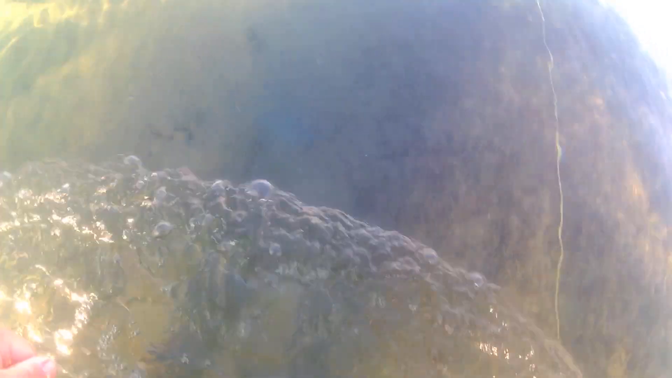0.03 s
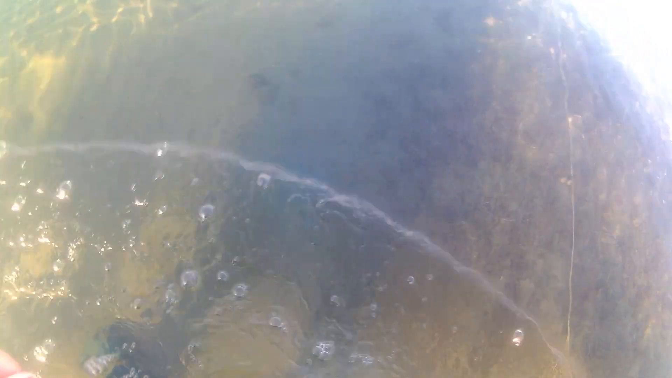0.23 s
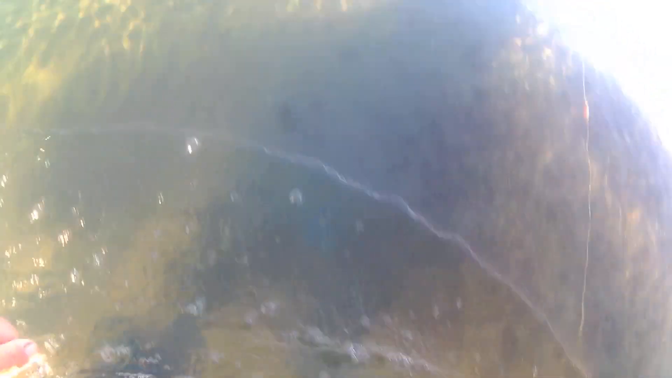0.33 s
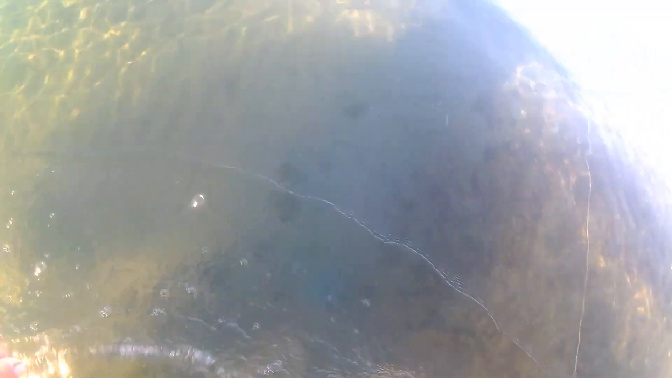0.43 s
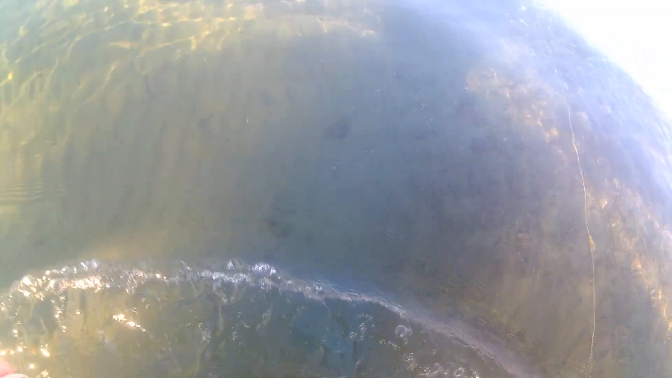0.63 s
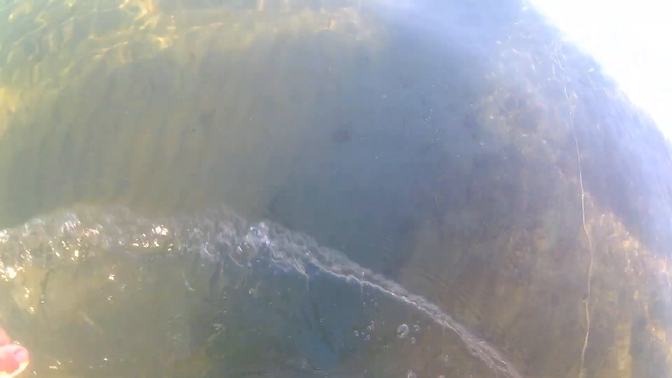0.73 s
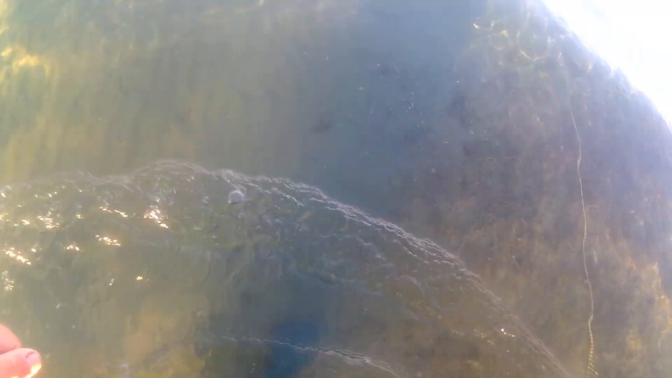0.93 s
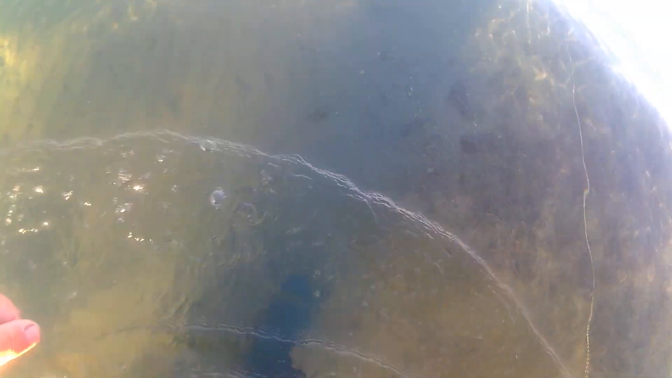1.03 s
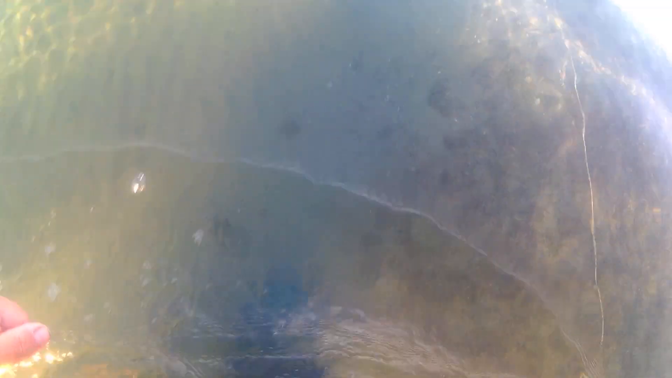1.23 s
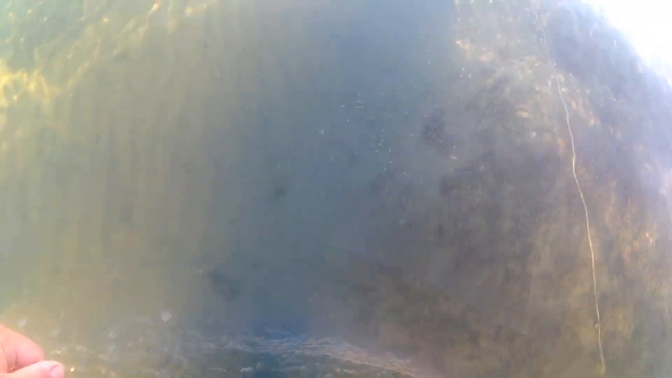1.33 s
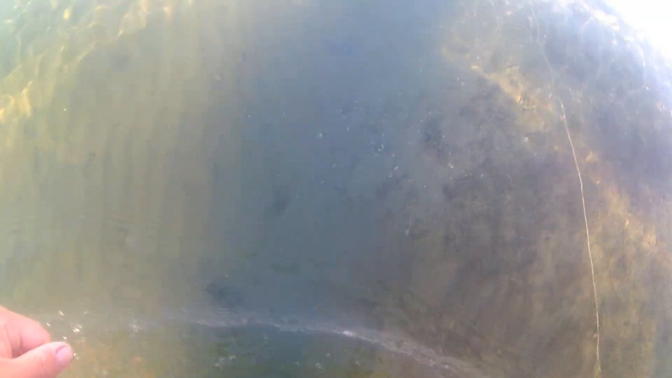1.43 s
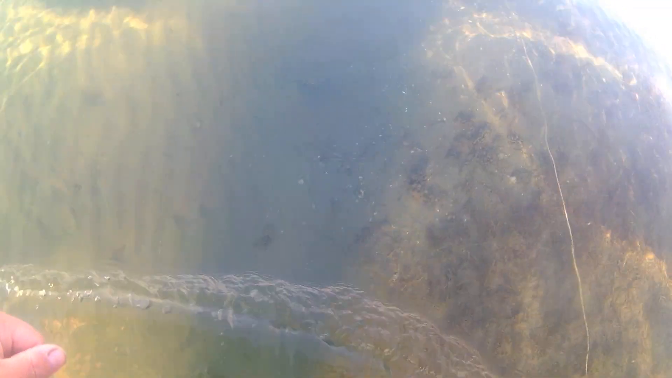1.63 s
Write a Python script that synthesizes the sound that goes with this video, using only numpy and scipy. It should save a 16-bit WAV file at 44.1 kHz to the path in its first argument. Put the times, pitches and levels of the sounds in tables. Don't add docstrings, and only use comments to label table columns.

```python
import sys
import numpy as np
from scipy import signal
from scipy.fft import rfft, irfft, next_fast_len
from scipy.io import wavfile
from scipy.ndimage import map_coordinates

SR = 44100
rng = np.random.default_rng(int(sys.argv[2]) if len(sys.argv) > 2 else 0)


def waveform_to_disk(signal):
    frames = np.transpose(np.atleast_2d(signal))
    scaled = np.clip(frames, -1, 1) * 32767
    samples = np.round(scaled).astype(np.int16)
    wavfile.write(sys.argv[1], SR, samples)


def voltage_ratio(level):
    return 10 ** (np.asarray(level, float) / 20)


N = 74970
DAMPING_GROWS = 1.175


def unit(x):
    return x / np.sqrt(np.mean(x ** 2) + 1e-20)


def curve(rows):
    return np.interp(np.arange(N) / SR, *np.transpose(rows))


def wobble(rate):
    knots = rng.standard_normal(int(N * rate / SR) + 4)
    return map_coordinates(knots, [np.arange(N) * rate / SR])


def filtered(x, response):
    size = next_fast_len(N + SR // 2)
    spectrum = rfft(x, size) * response(np.fft.rfftfreq(size, 1 / SR))
    return irfft(spectrum, size)[..., :N]


def resonances(peaks):
    def response(f):
        total = 0
        for k, (hz, width, db) in enumerate(peaks):
            damping = 1j * f * width
            total = total + (-1) ** k * voltage_ratio(db) * damping / (hz * hz - f * f + damping)
        return total
    return response


def ring(start_s, hz, db, t60, rise_s, grows=1):
    first = round(start_s * SR)
    t = np.maximum(np.arange(N) / SR - start_s, 0)[first:][:SR // 4]
    level = voltage_ratio(db - 60 * (t / t60) ** grows) * (1 - np.exp(-t / rise_s))
    out = np.zeros(N)
    out[first:][:len(t)] = level * np.sin(2 * np.pi * hz * t)
    return out


# frequency in Hz, level in dB per Hz.
HISS = [(12, -32), (20, -3), (70, -0.5), (897, -16), (976, -17), (1610, -18), (4540, -23.5), (9670, -25.5),
        (16000, -24.5)]
# frequency in Hz, level in dB rms.
WHINE = [(9135, -97.5), (9297, -86), (9378, -81), (9453, -81), (9534, -89)]
HISS_DB = -61.5
HUM_HZ, HUM_DB = 60, -71


def electronics():
    t = np.arange(N) / SR
    hiss_hz, hiss_db = np.transpose(HISS)

    def colour(hz):
        return voltage_ratio(np.interp(np.log(hz + 1), np.log(hiss_hz + 1), hiss_db))

    hiss = voltage_ratio(HISS_DB + 0.4 * wobble(9.2)) * unit(filtered(rng.standard_normal(N), colour))
    hum = voltage_ratio(HUM_DB + 2.8 * wobble(8)) * np.sin(2 * np.pi * HUM_HZ * t + 0.4 * wobble(7.6))
    whine = np.zeros(N)
    for hz, db in WHINE:
        phase = 2 * np.pi * (hz * t + rng.random()) + 0.8 * wobble(17)
        whine += voltage_ratio(db + 1) * np.sin(phase)
    return hiss + hum + whine


# time in seconds, level in dB.
SLOSH = [
    (0.0, -87),
    (0.236, -56.5),
    (0.444, -58.5),
    (0.548, -75),
    (0.808, -66.5),
    (1.164, -64),
    (1.61, -83),
    (1.7, -77),
]
# frequency in Hz, width in Hz, level in dB.
SLOSH_BAND = [(176, 70, -3), (264, 17, 1.5)]


def slosh():
    murmur = filtered(rng.standard_normal(N), resonances(SLOSH_BAND))
    return voltage_ratio(curve(SLOSH) - 6) * unit(voltage_ratio(2.5 * wobble(45)) * murmur)


# time in seconds, level in dB.
TRICKLE = [(0, -70.5), (.1, -68.5), (.15, -60.5), (.2, -66.5), (.3, -56.5), (.36, -55), (.44, -59.5),
           (.51, -59), (.58, -66.5), (.74, -65.5), (.82, -59), (.88, -65), (.96, -59.5), (1.1, -61),
           (1.16, -71.5), (1.27, -56.5), (1.36, -71), (1.7, -72.5)]
# frequency in Hz, width in Hz, level in dB.
SHELL = [(902, 86, -3.5), (1424, 200, -18), (1668, 105, -6), (4170, 200, -15)]
TICKS_PER_S, TICK_SPREAD_DB = 520, 3
WASH_SHARE = 0.5


def trickle():
    hits = rng.random(N) < TICKS_PER_S / SR
    ticks = hits * voltage_ratio(TICK_SPREAD_DB * rng.standard_normal(N)) * rng.choice([-1, 1], N)
    wash = rng.standard_normal(N)
    drive = np.sqrt(1 - WASH_SHARE) * unit(ticks) + np.sqrt(WASH_SHARE) * wash
    clumped = drive * voltage_ratio(3.3 * wobble(30))

    def shell(f):
        return resonances(SHELL)(f) * resonances([(1680, 600, 0)])(f)

    return voltage_ratio(curve(TRICKLE)) * unit(filtered(clumped, shell))


# start in seconds, level in dB, t60 in seconds.
RUNOFF = [
    (.335, -54, 0.48),
    (1.283, -60, 0.18),
]
# frequency in Hz, width in Hz, level in dB.
RUNOFF_BANDS = [(780, 90, -5), (1346, 200, -0.5)]


def runoff():
    t = np.arange(N) / SR
    level = np.zeros(N)
    for start_s, db, t60 in RUNOFF:
        level += (t > start_s) * voltage_ratio(db - 60 * np.abs(t - start_s) / t60)

    def lid(f):
        return resonances(RUNOFF_BANDS)(f) * resonances([(1100, 900, 0)])(f)

    gurgle = rng.standard_normal(N) * voltage_ratio(3.5 * wobble(60))
    return level * unit(filtered(gurgle, lid))


# start in seconds, level in dB, pitch in Hz.
DRIPS = [(.8200, -51, 1660), (.8470, -55, 1690), (0.922, -49, 1650), (0.953, -54, 1560), (0.972, -55, 1510),
         (1.016, -55, 1790), (1.097, -54, 1488), (1.228, -58, 1730), (1.239, -67, 1670), (1.264, -50, 1547),
         (0.149, -49, 1670)]


def drips():
    return sum(ring(s, hz, db, 0.0298, 0.00071, DAMPING_GROWS) for s, db, hz in DRIPS)


# frequency in Hz, t60 in seconds.
BODY = [(200, 0.14), (236, .18), (262, .4), (630, 0.21)]
# start in seconds, then the level of each body mode in dB.
THUDS = [
    (0.2289, -60, -79, -50, -67),
    (.2490, -52, -54.5, -49.5, -71),
    (0.3279, -39, -43.5, -53.5, -48),
    (0.5252, -53, -57, -56, -65),
    (0.6306, -51, -55, -61.5, -73),
    (1.1635, -53, -84.5, -61, -59),
    (1.2780, -34, -38.5, -67, -47.5),
]
# start in seconds, level in dB, pitch in Hz.
SHOVES = [
    (0.2472, -48, 109),
    (0.327, -38, 111.5),
    (1.2764, -52, 111),
]


def thuds():
    out = np.zeros(N)
    for start_s, *levels in THUDS:
        for (hz, t60), db in zip(BODY, levels):
            out += ring(start_s, hz, db, t60, 0.00139)
    for start_s, db, hz in SHOVES:
        out += ring(start_s, hz, db, 0.05, 0.001927)
    return out


# start in seconds, level in dB, shell pitch in Hz, lens port level in dB,
# level of crack and high modes in dB; the last two are relative to the blow.
BLOWS = [(.2280, -20, 1662, -27.5, -29), (0.2326, -25.5, 1647, -36, -35.5),
         (0.2492, -21.5, 1850, -14, -16.5), (.2518, -20.5, 1710, -35, -19), (.2950, -50, 1719, -24, -24),
         (0.327, -21.5, 1826, -2.5, -18), (0.3282, -5, 1804, -4, -9.5), (.3720, -43, 1610, -26, -24),
         (.4040, -52, 1540, -23, -23.5), (0.5254, -30, 1832, -14, -20), (0.5304, -41.5, 1640, -27, -23.5),
         (1.0764, -43.5, 1700, -16.5, -24.5), (1.1625, -29, 1950, -23, 7), (1.1630, -21, 1616, -1, 3),
         (1.1713, -55, 1650, -21.5, -35), (1.27, -40.5, 1680, -17.5, -17), (1.2776, -27, 1540, -5, -1.5),
         (1.2808, -37, 1770, -17.5, -10.5), (1.2850, -38, 1700, -18, -19.5), (1.3, -41, 1650, -16, -23),
         (1.5599, -25, 1828, -13, -11), (1.5645, -53, 1770, -29, 3)]
# frequency in Hz, level in dB, t60 in seconds.
BRIGHT = [(2052, -6.5, 0.0083), (2310, -7.5, .009), (2690, -8.5, 0.0092), (3223, -11.5, .008),
          (4420, -7, 0.0066), (5310, -23, 0.0095), (6221, -17, 0.0072), (7130, -22, 0.0054),
          (10600, -29, 0.00834)]
# start in seconds, level in dB, pitch in Hz,
# upper mode in dB, lower mode in dB, both relative to the main one.
LID_KNOCKS = [(.2280, -33, 917, 1, 7), (.2487, -25.5, 893, -3.5, 0), (0.3279, -19.5, 954, -11, -10),
              (0.5263, -40, 1045, -7, -15), (.6312, -47.5, 880, -12, -14), (1.1629, -19, 929, -3.5, -25),
              (1.1700, -33, 900, -5, -0.5), (1.2773, -30, 900, -4.5, -18),
              (1.2806, -29.5, 938, -12.5, -3.5), (1.2850, -38, 800, -6, 5), (1.5599, -35.5, 929, -2, -10)]
# ratio to the knock's pitch, t60 in seconds.
LID = [(0.9795, 0.023), (1.45, 0.022), (0.83, 0.0067)]
SHELL_T60_S, SHELL_RISE_S = 0.014, 0.00068
PORT_HZ, PORT_T60_S = 3979, 0.009
CRACK_DB, CRACK_T60_S = -22, 0.0066
LID_LEAD_S = 0.0007
SEAL_HZ = 676


def seal(f):
    return ((1j * f) ** 2 / (SEAL_HZ ** 2 - f * f + 1.3j * f * SEAL_HZ)) ** 2


def slaps():
    out = np.zeros(N)
    noise = rng.standard_normal(N)
    scatter = rng.standard_normal((len(BLOWS), 2, 16))
    for (start_s, db, hz, port_db, bright_db), (level_shift, pitch_shift) in zip(BLOWS, scatter):
        out += ring(start_s, hz, db + 3, SHELL_T60_S, SHELL_RISE_S, DAMPING_GROWS)
        out += ring(start_s, PORT_HZ, db + port_db, PORT_T60_S, 0.00022, DAMPING_GROWS)
        for k, (mode_hz, mode_db, t60) in enumerate(BRIGHT):
            shifted_hz = mode_hz * (1 + 0.012 * pitch_shift[k])
            shifted_db = db + bright_db + mode_db + 1.348 * level_shift[k]
            out += ring(start_s, shifted_hz, shifted_db, t60, 0.0002, DAMPING_GROWS)
        t = np.arange(N) / SR - start_s
        crack_db = db + bright_db + CRACK_DB - 60 * np.abs(t) / CRACK_T60_S
        out += (t > 0) * voltage_ratio(crack_db) * noise
    for start_s, db, hz, upper_db, lower_db in LID_KNOCKS:
        for (ratio, t60), mode_db in zip(LID, (0, upper_db, lower_db)):
            out += ring(start_s - LID_LEAD_S, hz * ratio, db + mode_db, t60, 0.000288, DAMPING_GROWS)
    return filtered(out, seal)


def scene():
    background = electronics() + slosh() + trickle()
    after_the_slaps = runoff() + drips()
    return (background + after_the_slaps + thuds() + slaps())[None]


def low_pass(x):
    return signal.sosfilt(signal.butter(12, 16800, fs=SR, output="sos"), x)


def record(dry):
    top_hz = 15750

    def input_filter(hz):
        return voltage_ratio(-np.clip(hz - top_hz, 0, None) / 55 - 12.5 * (hz > top_hz))

    return low_pass(filtered(dry, input_filter))


dry = scene()
out = record(dry)
waveform_to_disk(out)
```